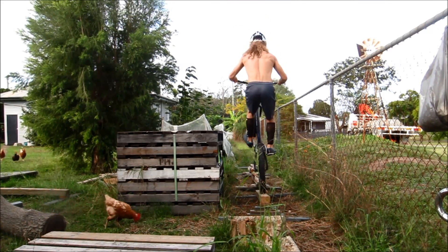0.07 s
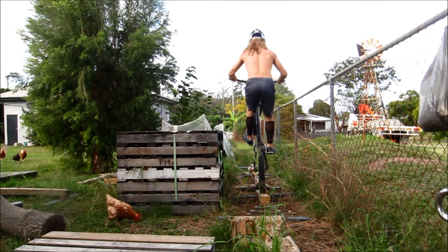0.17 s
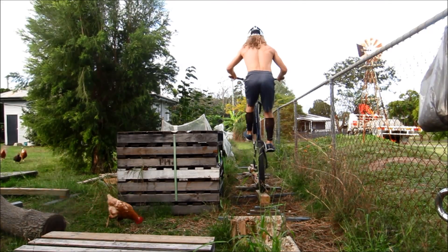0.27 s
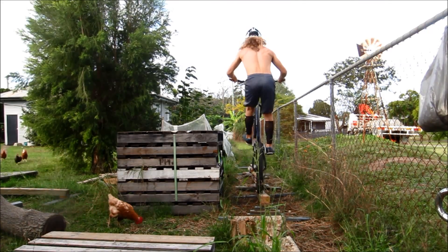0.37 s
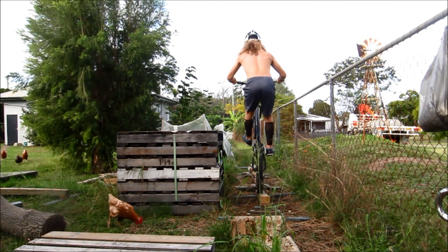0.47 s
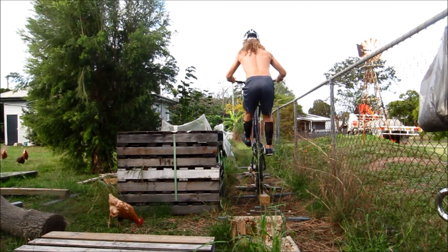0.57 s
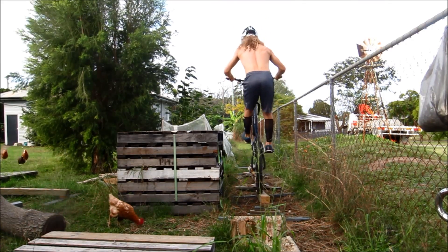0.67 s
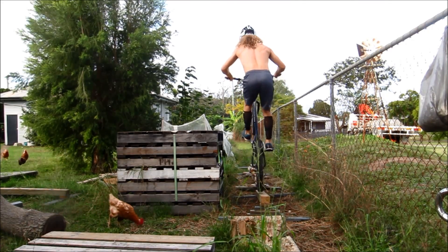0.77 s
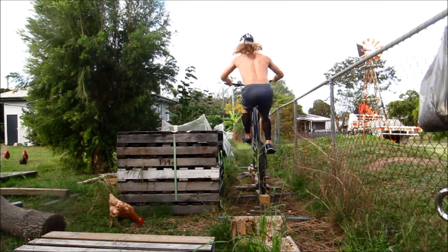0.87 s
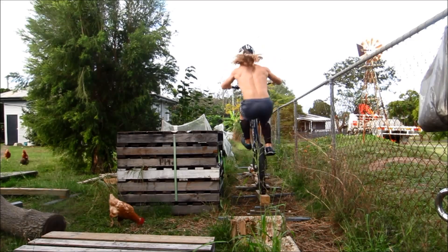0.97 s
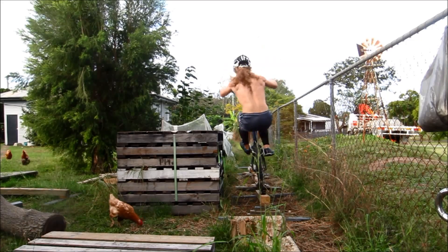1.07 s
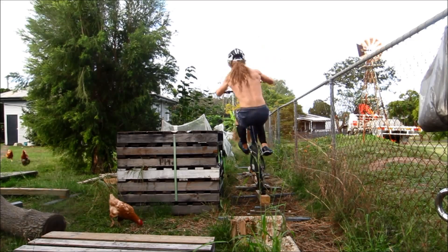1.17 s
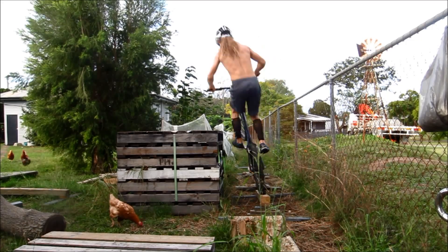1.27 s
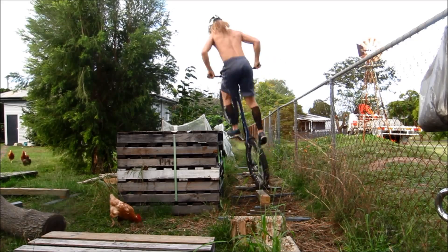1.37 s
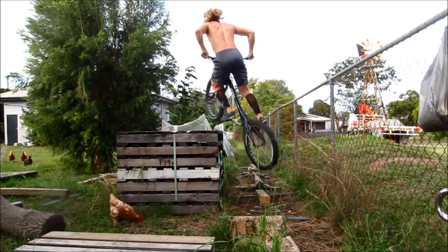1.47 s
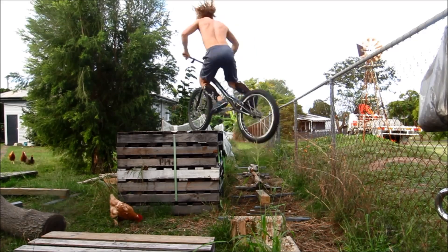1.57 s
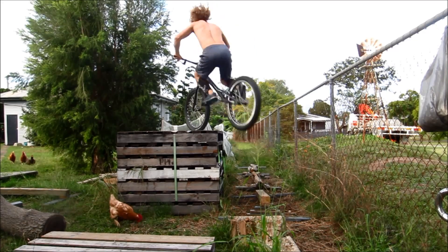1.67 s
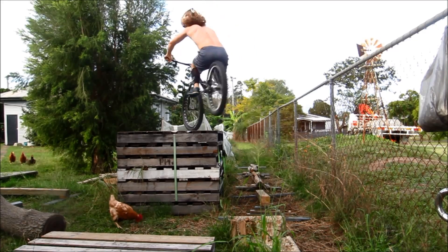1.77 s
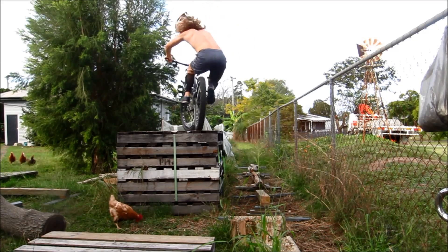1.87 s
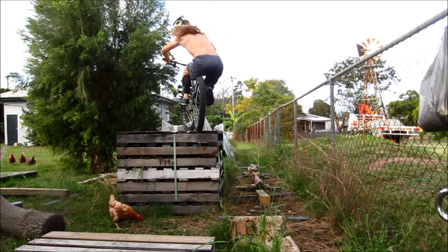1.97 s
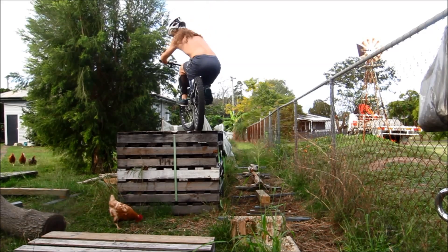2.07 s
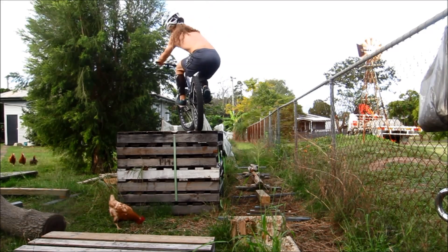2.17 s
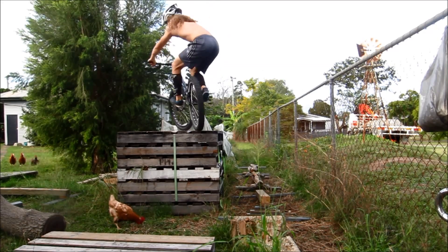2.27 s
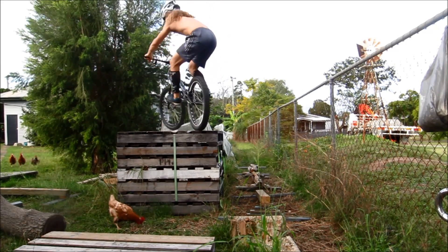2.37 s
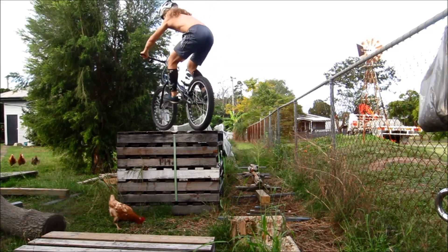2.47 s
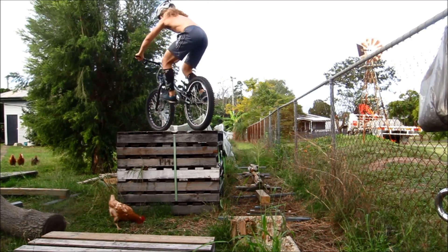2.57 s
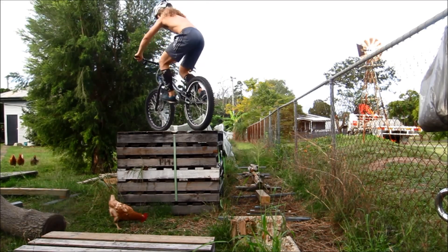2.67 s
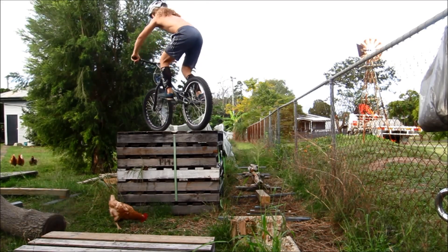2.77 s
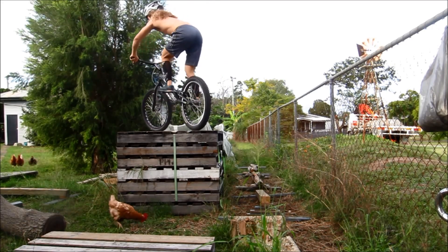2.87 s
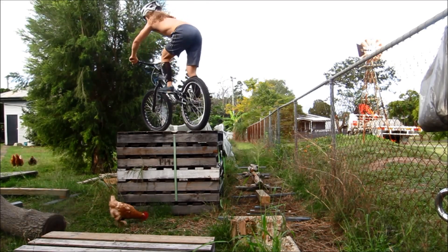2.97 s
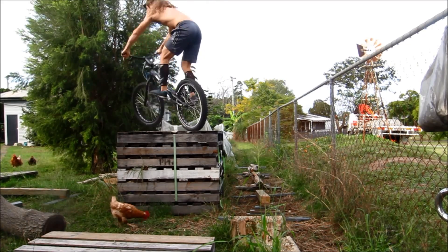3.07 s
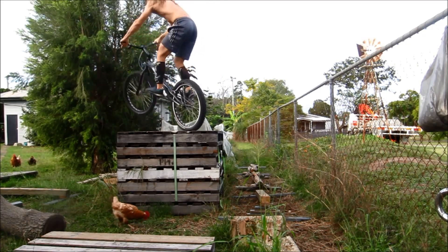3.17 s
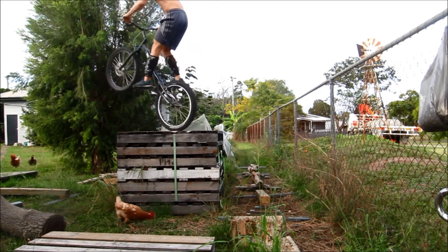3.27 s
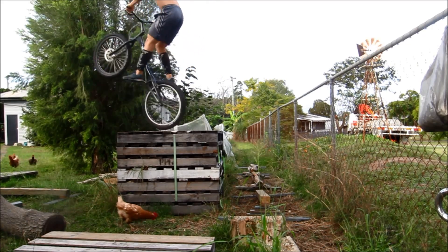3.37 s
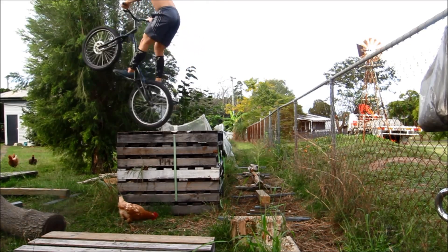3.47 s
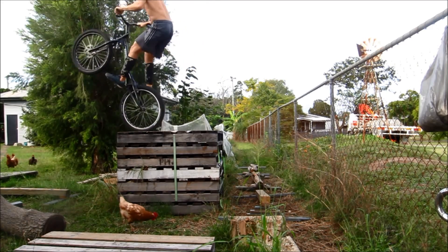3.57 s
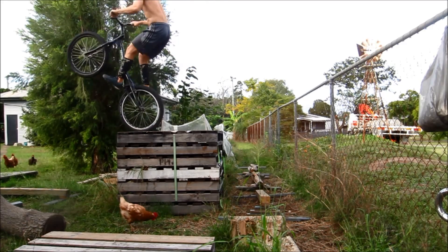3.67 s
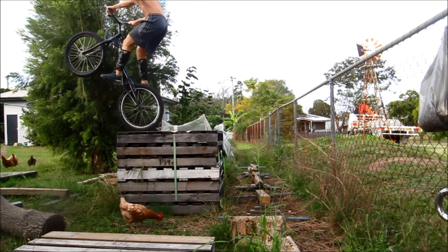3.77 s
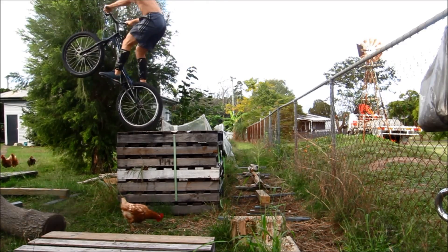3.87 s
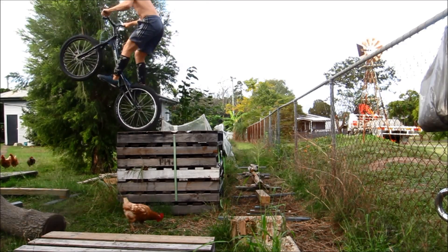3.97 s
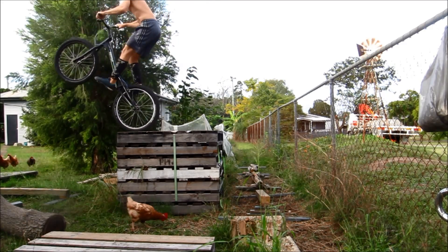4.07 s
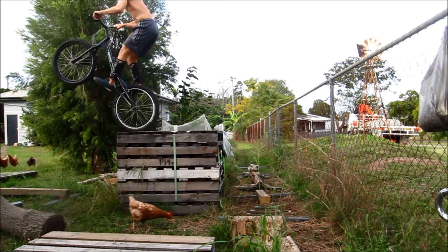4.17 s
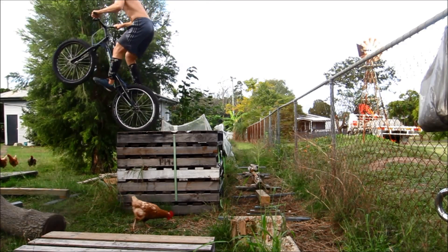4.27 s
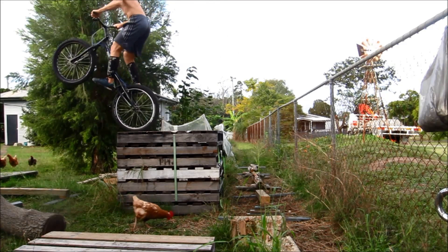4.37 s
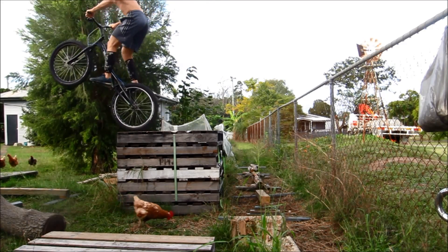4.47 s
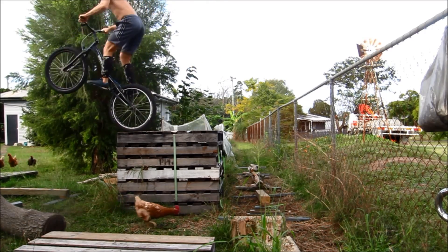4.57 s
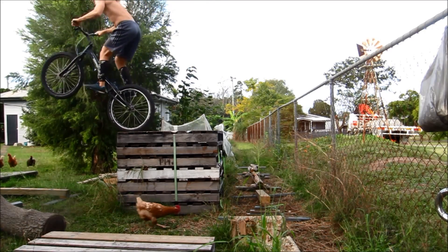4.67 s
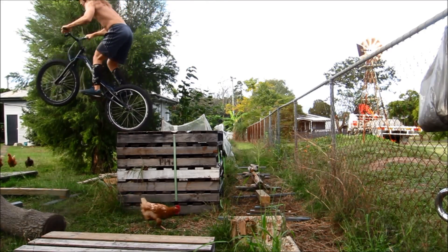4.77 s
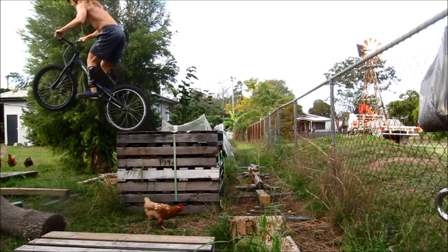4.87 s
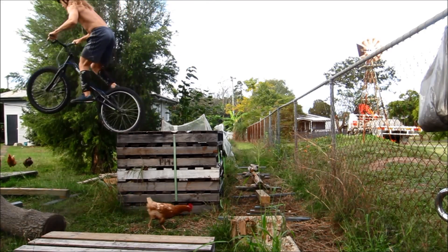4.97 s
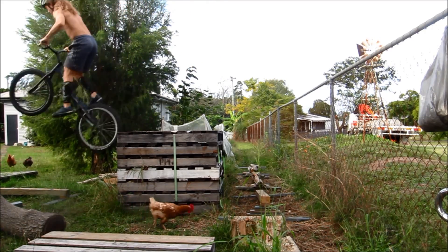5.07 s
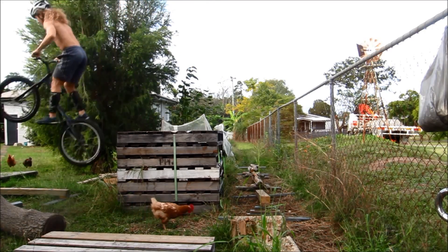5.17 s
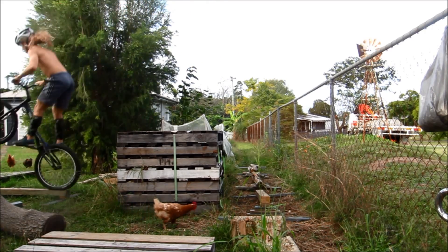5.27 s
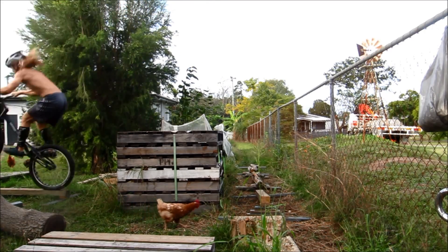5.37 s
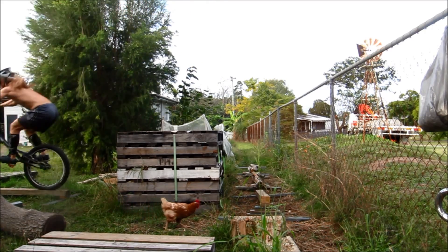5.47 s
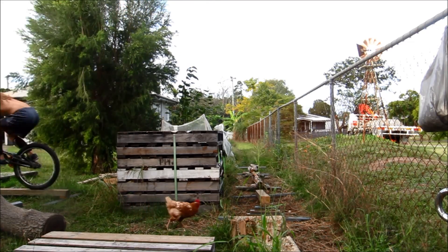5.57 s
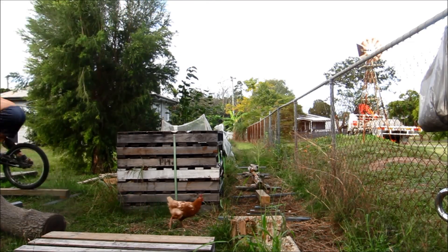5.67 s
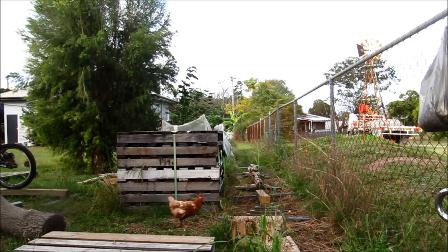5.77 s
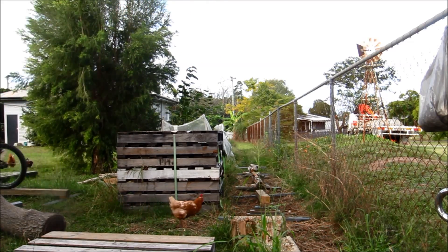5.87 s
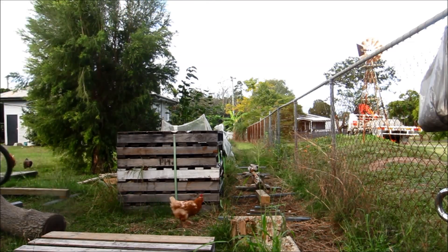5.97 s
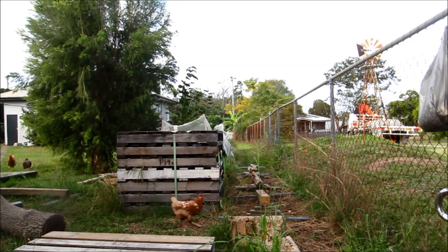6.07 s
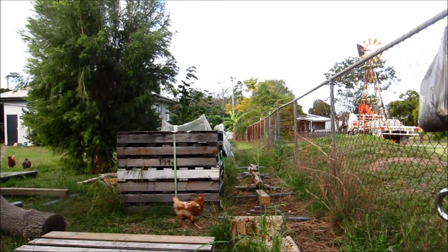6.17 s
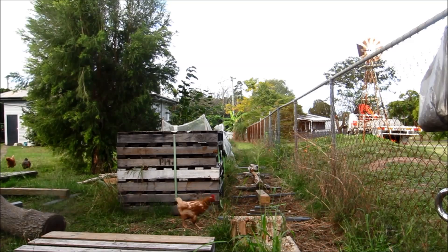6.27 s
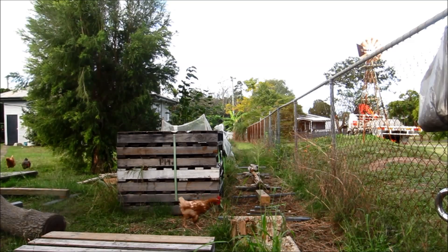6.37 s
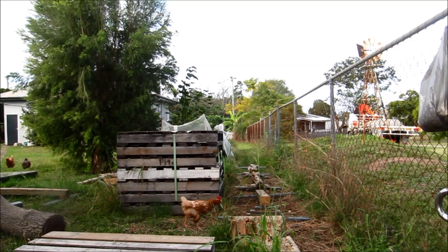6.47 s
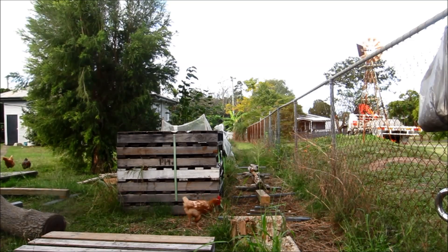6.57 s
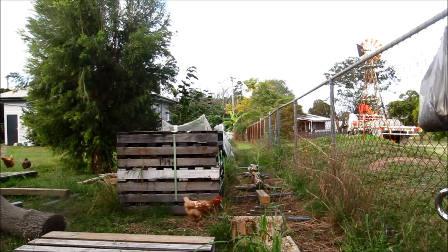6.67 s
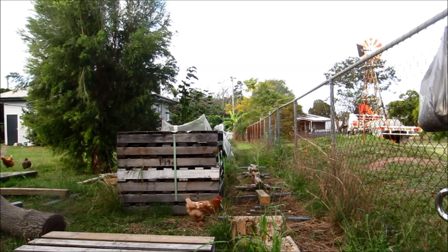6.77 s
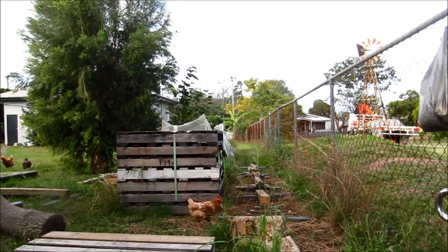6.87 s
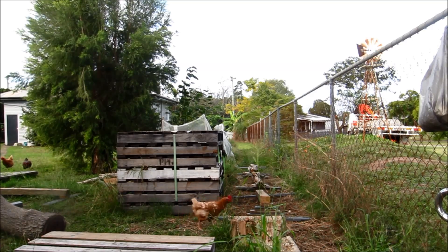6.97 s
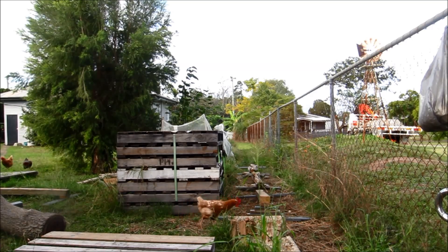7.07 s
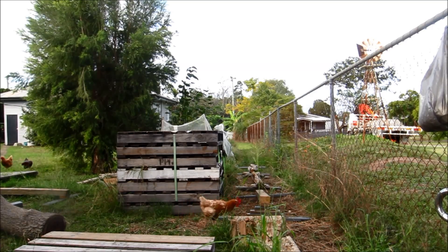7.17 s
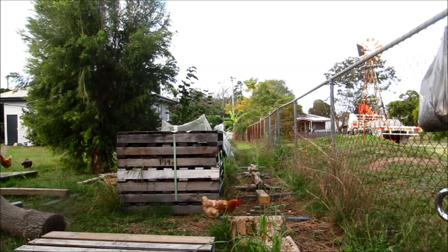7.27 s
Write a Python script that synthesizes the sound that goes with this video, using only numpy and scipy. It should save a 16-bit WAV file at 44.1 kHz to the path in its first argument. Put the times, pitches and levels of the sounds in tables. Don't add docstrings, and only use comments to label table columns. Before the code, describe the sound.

A low, steady far-traffic roar with an engine hum lies under everything, in an open yard with a short diffuse echo. From 0 to 1.2 seconds, chain, spokes and levers tick and rattle, with tiny rubber chirps near 0.2 and 1.1. At 1.33-1.5 rim brakes squawk in quick harsh bursts; at 1.65 tyres slam a hollow pallet stack with a woody boom. Softer thumps and metal rattles follow at 2.0 and 2.6, with a knock at 3.0 and brief freewheel buzzes around 2.85 and 3.4. A loud brake bark hits at 3.5 and the traffic dips. Faint bumps and squeaks run from 4.0 to 4.6. At 5.24 a hard squawk and clattering knock sound, then a landing thud at 5.6. Freewheel clicks and small ticks trail from 6.0 to 7.0 as traffic swells back.

```python
import sys
import numpy as np
from scipy import signal
from scipy.fft import rfft, irfft, next_fast_len
from scipy.io import wavfile
from scipy.ndimage import uniform_filter1d, map_coordinates

SR = 44100
rng = np.random.default_rng(int(sys.argv[2]) if len(sys.argv) > 2 else 0)


def volts_from_decibels(level):
    exponent = np.asarray(level, float) / 20
    return 10 ** exponent


def output_pcm(signal):
    pcm = np.clip(np.atleast_2d(signal).T, -1, 1) * 32767
    wavfile.write(sys.argv[1], SR, np.round(pcm).astype(np.int16))


N = 322803
T = np.arange(N) / SR


def band(x, hz, width):
    return signal.lfilter(*signal.iirpeak(min(hz, .45 * SR), hz / width, fs=SR), x)


def body(x, modes):
    return sum((-1) ** k * volts_from_decibels(db) * band(x, hz, width) for k, (hz, width, db) in enumerate(modes))


def decay(t, t60):
    return np.exp(-np.log(1000) * t / t60)


def ring(t, hz, db, t60):
    return volts_from_decibels(db) * np.sin(2 * np.pi * hz * t) * decay(t, t60)


def cut(x, lo_hz, hi_hz):
    return signal.sosfilt(signal.butter(3, [lo_hz, hi_hz], "band", fs=SR, output="sos"), x)


def top(x):
    return cut(band(x, 10400, 3000.0) + 0.2 * x, 7800, 15800)


def peak(x, db):
    return x * volts_from_decibels(db) / np.abs(x).max()


def rms(x):
    return x / np.sqrt(np.mean(x ** 2))


def add(out, x, s):
    i = int(s * SR)
    out[i:i + len(x)] += x[:N - i]


def walk(rate, size=N):
    k = int(SR / rate)
    steps = np.repeat(rng.standard_normal(size // k + 1), k)
    return 2.18 * uniform_filter1d(uniform_filter1d(steps, k), k)[:size]


def pulses(hz, jitter, scatter_db, chance):
    period = max(int(SR / np.mean(hz)), 1)
    unevenness = rms(uniform_filter1d(chance[0], period))
    cycle = np.floor(np.cumsum(hz / SR * (1 + jitter * unevenness)))
    return np.diff(cycle, prepend=0).clip(0, 1) * volts_from_decibels(scatter_db * chance[1])


def brakes():
    # start in seconds, peak in dB, slip rate in Hz, fade length in ms, swell in ms.
    grabs = [(1.331, -2.5, 910, 7.4, 10.5), (1.347, -5.5, 719, 20, 6.4), (1.450, -4.5, 809, 14, 10.6),
             (1.488, -19.5, 812, 37, 2.5), (3.503, 1, 903, 8.5, 5.07), (5.236, 1, 722, 14, 4.3),
             (5.249, -5, 850, 8.5, 4.8), (2.766, -22, 2400, 9.9, 10.5)]
    # frequency in Hz, width in Hz, level in dB.
    fork_notes = [(1763, 100, -7.5), (2560, 120, -8), (2940, 110, -6), (3540, 240, -6), (4300, 160, -13),
                  (4780, 90, -11), (5720, 81, -12)]
    # frequency in Hz, width in Hz, level in dB.
    rim_notes = [(880, 110, -19), (560, 200, -21), (1170, 190, -9), (1470, 130, -4), (1800, 300, -8),
                 (2140, 120, -6), (2635, 540, -6), (3400, 610, -8), (5600, 1400, -5), (10400, 13600, -10)]
    # frequency in Hz, level in dB, t60 in seconds.
    rear_rim = [(868, -7.5, 1), (900, -3.5, 0.6), (985, 6, 0.091), (1810, -4, 0.35), (1670, -7, 0.4),
                (2750, -12, .3)]
    front_rim = [(856, 0, 1.03), (838, -6, 1.1), (1133, -2, 0.061), (1860, -8.5, 0.45)]
    # start in seconds, level in dB.
    rear_rings = [(1.35, -27.5), (3.515, -28), (5.26, -32)]
    front_rings = [(1.47, -29), (5.26, -29.5), (5.61, -38.5)]
    slow_slip_hz, slow_note_db = 793, -9
    fork_spread, bright_db = .04, -3.5
    ring_duck = 0.71
    out, rings, ms = np.zeros(N), np.zeros(N), T[:SR // 8] * 1000
    draws = rng.standard_normal((len(grabs), 3, SR // 8))
    for (s, db, hz, fade_ms, swell_ms), chance in zip(grabs, draws):
        swell = np.clip(ms / swell_ms, 0, 1) ** 1.14
        grip = swell * np.exp(-np.clip(ms - swell_ms, 0, None) / (0.5 * fade_ms))
        slip_hz = hz * (1 - 0.0014 * ms).clip(.8, 1)
        scrape = 0.13 * chance[2]
        slips = (pulses(slip_hz, 0.055, 2.54, chance) + scrape) * grip
        fork = [(f * (1 + fork_spread * c), w, g) for (f, w, g), c in zip(fork_notes, chance[2, -8:])]
        squawk = volts_from_decibels(slow_note_db * (hz < slow_slip_hz)) * 0.98 * band(slips, hz, 104.0)
        squawk = squawk + 0.67 * band(slips, 2 * hz, 210.0)
        squawk = squawk + volts_from_decibels(bright_db) * body(slips, rim_notes[3:]) + 0.23 * body(slips, rim_notes[:3])
        squawk = squawk + 0.75 * body(slips + scrape * grip, fork)
        add(out, peak(cut(squawk, 380, 11400), db), s)
    for modes, strikes in ((rear_rim, rear_rings), (front_rim, front_rings)):
        for s, db in strikes:
            disturbed = sum(ring(T[:SR], *mode) * volts_from_decibels(1.7 * walk(50, size=SR)) for mode in modes)
            add(rings, volts_from_decibels(db) * disturbed, s)
    return out + rings * volts_from_decibels(ring_duck * ducking())


def thuds():
    # start in seconds, peak in dB, main note
    # in Hz, slap in dB.
    landings = [(0.957, -34, 231, -3), (1.655, -7.5, 212.7, -10), (1.952, -19, 191.5, -2),
                (1.967, -21.5, 216, -11), (1.985, -16.5, 209, 5), (2.593, -17.5, 215, -15),
                (3.116, -24.5, 199, -6.5), (3.591, -28.5, 240, -6), (3.991, -23, 229, -13),
                (4.014, -26, 206, -7), (4.625, -29, 245, -13), (4.644, -27.5, 206, 1),
                (5.11, -27, 234, -12), (5.373, -31.5, 213, -9), (5.428, -37, 249, -14),
                (5.588, -22, 265, -6)]
    # ratio to the main note, level in dB, t60 in seconds.
    stack_modes = [(.25, -16, .2), (.52, -10.5, .2), (.86, -8, .14), (1.0, 0, 0.6), (1.17, -14.5, 0.088),
                   (1.72, -5.5, 0.18), (2.3, -19, 0.056), (2.85, -10.5, 0.13), (3.7, -20, 0.075)]
    # time in seconds, frequency in Hz, level in dB.
    tyre_air = [(1.75, 194.5, -53), (2.15, 194, -54), (2.5, 194, -56), (2.75, 193.6, -50),
                (3.19, 193.6, -48), (3.31, 193.6, -61), (4.0, 190, -58), (4.25, 190, -53), (4.55, 190, -60),
                (4.9, 189, -54), (5.23, 188.7, -53)]
    out, t = np.zeros(N), T[:SR // 3]
    for (s, db, hz, slap_db), chance in zip(landings, rng.standard_normal((len(landings), SR // 3))):
        modes = 0
        for (ratio, level, t60), c, e in zip(stack_modes, chance, chance[8:]):
            varies = abs(ratio - 1) > .1
            modes = modes + ring(t, hz * ratio * (1 + 0.032 * c * varies), level + 2.8 * e * varies, t60)
        rattle = 0.21 * peak(cut(chance, 216, 840) * np.exp(-t / 0.016), 0)
        contact_s = 0.038 * volts_from_decibels(0.32 * (db + 9))
        boom = modes * (1 - np.exp(-t / 0.00096)) * np.exp(-(t / contact_s) ** 2)
        add(out, peak(cut(peak(boom, 0) + rattle, 45, 2900), db), s)
        slap = cut(chance[::-1], 495, 2960) * np.exp(-t / 0.03)
        add(out, peak(slap, db + min(slap_db, 0) + 0.5), s)
    s, hz, db = np.transpose(tyre_air)
    hum = np.sin(2 * np.pi * np.cumsum(np.interp(T, s, hz) + 3.0 * walk(20)) / SR) * np.sqrt(2)
    return out + hum * volts_from_decibels(np.interp(T, s, db, -120, -120) + 3.0 * walk(22))


def knocks():
    # start in seconds, peak in dB, note in Hz, width in Hz, t60 in seconds.
    blows = [(0.9549, -23.5, 1890, 1800, 0.071), (1.343, -15, 890, 110, 0.025),
             (1.268, -22.5, 2300, 1200, 0.04), (1.654, -6.5, 2200, 2300, 0.0022),
             (3.0165, -14.5, 1950, 593, 0.024), (3.021, -26, 1800, 500, 0.07), (3.111, -30, 130, 97.2, .12),
             (3.5050, -4, 933, 188, 0.024), (5.2354, -4.5, 2940, 2400, 0.054),
             (5.238, -12, 10400, 3000, 0.09), (5.247, -9, 2860, 2400, 0.044), (5.25, -16, 1100, 300, 0.084),
             (5.580, -29, 1800, 2400, 0.015), (5.5882, -9, 720, 250, 0.02), (5.5883, -9, 1290, 300, 0.02),
             (5.602, -17.5, 900, 503, 0.096), (5.606, -17, 3150, 1490, 0.062),
             (5.612, -23, 1600, 800, 0.09), (5.615, -40, 4670, 400, 0.026), (6.302, -30, 62, 55, 0.096),
             (5.24, -30, 540, 45, .025), (5.11, -32, 95, 40, .12), (3.995, -32, 360, 50, .1),
             (5.25, -10, 845, 75, .02), (3.5, -22, 3000, 2500, .04), (3.506, -16, 6000, 3000, .045),
             (3.507, -17, 10600, 3000, .045), (3.535, -31, 11000, 2800, .06),
             (5.275, -26, 10500, 2800, .06), (3.505, -17, 1790, 130, .025), (5.592, -22, 480, 200, .09),
             (1.338, -16, 5600, 1200, .04), (1.352, -19, 5600, 1200, .05), (5.238, -14, 5600, 2000, .06)]
    clean_t60_s, click_db = .028, 16
    out, t = np.zeros(N), T[:8192]
    for (s, db, hz, width, t60), chance in zip(blows, rng.standard_normal((len(blows), 8192))):
        rattle = chance * decay(t, t60) * (1 - np.exp(-t / (0.08 * t60)))
        click = np.exp(-((t - .0007) / 0.00011) ** 2)
        blow = rattle - volts_from_decibels(click_db) * (t60 < clean_t60_s) * click
        for broad in (width, 1.4 * width, min(7.1 * width, SR / 2.1)):
            blow = band(blow, hz, broad)
        add(out, peak(blow, db), s)
    return out


def ticks():
    # start in seconds, peak in dB, note in Hz.
    chain = [(.485, -25, 5900), (.5357, -29.5, 5730), (.942, -40, 5330), (1.0096, -16, 4820),
             (1.2995, -21.5, 5750), (1.4115, -21, 6600), (1.4247, -23, 4680), (1.6616, -15, 4480),
             (1.7783, -20, 5270), (1.9859, -19, 5430), (2.2567, -26.5, 5600), (2.2694, -22, 4870),
             (2.369, -30, 5770), (2.5977, -20.5, 4670), (2.6355, -19.5, 5500), (2.661, -28, 5390),
             (2.7262, -37, 4970), (2.8307, -22, 5750), (3.1185, -19, 4770), (3.7044, -34, 5260),
             (4.5929, -24.5, 6470), (4.6039, -20.5, 5200), (6.436, -30.5, 4840)]
    links = [(1.016, -22, 4800), (4.868, -38, 3000), (4.894, -30, 5000), (5.04, -40, 4500),
             (5.055, -42, 5200), (5.08, -35, 6500), (5.447, -36, 6560), (5.472, -39, 6500)]
    spokes = [(.0054, -18, 2650), (.0536, -19.5, 2800), (.1444, -43, 3700), (.4392, -24, 3000),
              (.584, -31, 4050), (.9552, -21, 3070), (1.081, -27, 4300), (1.529, -18.5, 4370),
              (2.5548, -21, 4120), (2.563, -38, 3830), (3.0585, -27, 2730), (3.3652, -16, 3030),
              (3.7137, -30.5, 3600), (4.029, -31, 3540), (5.3758, -28, 3230), (5.4934, -35, 3180),
              (5.543, -37, 4000), (6.4587, -30.5, 3580), (6.4877, -29, 4160), (6.8604, -25.5, 3460),
              (6.9371, -28, 3470), (6.9875, -25.5, 3470)]
    levers = [(.016, -26, 5900), (.0822, -32, 5200), (.471, -20.5, 3380), (.637, -38, 3730),
              (1.0054, -17.5, 6050), (1.268, -14.5, 5200), (1.2893, -17.5, 5100), (1.4504, -17.5, 3180),
              (1.503, -22, 5180), (1.5386, -20.5, 5600), (1.6174, -21, 3620), (1.7447, -19.5, 3600),
              (1.928, -26.5, 3310), (2.2025, -27.5, 4970), (3.7444, -40.5, 3130), (3.9897, -36, 3340),
              (4.0036, -25, 3250), (4.0966, -36, 4330), (4.1994, -32, 3750), (4.362, -41, 4500),
              (4.637, -29, 3200), (4.7307, -31, 5200), (4.8995, -20.5, 3400), (5.826, -27.5, 3480),
              (5.893, -35, 3700), (5.9339, -38, 3960)]
    cables = [(.1274, -28, 3000), (2.0096, -28, 3700), (2.087, -27, 3450), (3.382, -21, 3400),
              (3.59, -28.5, 2870), (3.6574, -32.5, 3560), (4.064, -32, 2990), (4.129, -37, 4390),
              (5.3852, -28.5, 3360), (6.7074, -21, 4150)]
    pedals = [(.4216, -23, 3270), (1.152, -33, 3100), (1.6787, -17, 3400), (1.8612, -17.5, 4900),
              (1.8786, -19.5, 3400), (1.9542, -22.5, 4700), (2.158, -32.5, 3270), (2.314, -19.5, 3430),
              (2.7422, -26, 6200), (5.098, -26, 3830), (5.4194, -39, 3480), (5.4494, -39, 3600),
              (5.607, -15.5, 4800), (5.616, -29, 3330)]
    pawls = [(6.0901, -38, 3410), (6.1275, -35, 4510), (6.1575, -30, 3030), (6.1934, -32, 4100),
             (6.2173, -31, 4190), (6.2538, -30, 3180), (6.3031, -27, 3890), (6.3201, -29, 3900),
             (6.3575, -36, 4000), (6.2787, -33, 3600), (6.6074, -31, 3900), (6.9486, -36, 3700),
             (6.5092, -37, 3790), (6.5705, -32, 3920), (6.7382, -31, 4400), (6.7915, -34, 4090),
             (6.8135, -30, 3880), (6.8369, -31, 3810), (6.9083, -33, 3680)]
    # contacts, bright top in dB, t60 in seconds.
    parts = [(chain, -5, 0.031), (spokes, -5.5, 0.047), (levers, -13.5, 0.048), (cables, -12, 0.11),
             (pedals, -6.5, 0.089), (pawls, -1, 0.022), (links, -3.5, .035)]
    out, t = np.zeros(N), T[:4096]
    for contacts, top_db, t60 in parts:
        fade = decay(t, t60) * (1 - np.exp(-t / (0.04 * t60)))
        chance = rng.standard_normal((len(contacts), 2, 4096))
        clumping = volts_from_decibels(21.4 * uniform_filter1d(chance[:, 1], size=40))
        spray = chance[:, 0] * clumping * fade
        for (s, db, hz), raw, broad, bright in zip(contacts, spray, cut(spray, 1220, 7150), top(spray)):
            note = band(raw, hz, 420.0) * 1.84
            add(out, peak(note + broad, db) + peak(bright, db + top_db), s)
    return out


def freewheel():
    # start in seconds, length
    # in seconds, level in dB, pawl clicks per second, chain hiss from 0 to 1.
    spins = [(1.36, 0.15, -44.5, 74, .9), (1.996, 0.24, -51, 53, .9), (2.564, 0.34, -58.5, 60, .9),
             (2.844, .15, -33, 113, 0.075), (3.231, 0.16, -50, 110, 1), (3.383, 0.12, -32, 115, 0.4),
             (5.111, 0.11, -29, 95, 1), (5.29, 0.3, -54.5, 63, .9), (5.643, 0.17, -43, 77, 0.21),
             (6.002, 0.075, -40.5, 104, 0.2), (6.09, 0.06, -39, 103, 0.2), (6.1575, 0.088, -39, 86, 0.2),
             (6.2538, 0.08, -38, 83, 0.22), (1.02, .155, -49, 60, .9), (1.24, .025, -52, 60, .9),
             (2.75, .07, -47, 60, .9), (6.34, .09, -54, 60, .9), (6.509, 0.31, -39.5, 88, 0.3),
             (6.821, 0.19, -45.5, 54, 0.25)]
    # frequency in Hz, width in Hz, level in dB.
    hub_modes = [(3840, 2400, 0.5), (6100, 2400, 2.5), (2200, 750, -2.5)]
    release_s, slowing_per_s = 0.013, .4
    near_db, near_top_db, top_db_per_db = -33, -2, 0.6
    out = np.zeros(N)
    for s, length, db, hz, blur in spins:
        t = T[:int((length + 5 * release_s) * SR)]
        chance = rng.standard_normal((5, SR // 2))[:, :len(t)]
        rate = hz * (1 - slowing_per_s * t)
        clicks = (t == 0) + pulses(rate, .04, 2.9, chance[:2])
        clicks = clicks + blur * pulses(rate * 1.7, 0.22, 6.1, chance[2:4])
        bursts = np.convolve(clicks, np.exp(-T[:1024] / 0.0028))[:len(t)]
        burst = chance[4] * (bursts + blur)
        if blur > .08:
            note = 1.3 * band(burst, 3600, 700.0)
        else:
            note = 1.4 * band(burst, 5200, 1400.0)
        top_db = near_top_db + top_db_per_db * (db - near_db)
        shell = rms(body(burst, hub_modes) + note) + volts_from_decibels(top_db) * rms(top(burst))
        add(out, shell * volts_from_decibels(db) * np.exp(-(t - length).clip(0) / release_s), s)
    return out


def chirps():
    # start in seconds, length in seconds, first pitch in Hz, last pitch in Hz, level in dB.
    glides = [(.147, 0.0091, 13100, 9000, -47), (0.207, 0.011, 9100, 13600, -41.5),
              (0.213, .012, 13700, 14000, -42), (0.625, 0.02, 14100, 5040, -55),
              (1.058, 0.013, 3300, 4600, -43), (1.08, 0.013, 8800, 10400, -47),
              (1.092, 0.022, 10350, 5030, -42), (1.11, 0.019, 5000, 6100, -36),
              (2.38, .024, 13500, 8350, -47), (2.427, 0.027, 12300, 9500, -53),
              (2.451, 0.046, 10200, 7600, -44.5), (2.773, .012, 4590, 4640, -39),
              (4.126, .014, 5600, 2600, -48), (4.136, .008, 5600, 5000, -52),
              (4.147, .011, 4180, 4600, -39), (4.157, .009, 4560, 5870, -45),
              (4.166, .007, 5900, 4400, -49), (4.169, 0.0114, 4470, 4450, -38),
              (4.179, 0.012, 4160, 3690, -40), (4.189, 0.012, 3700, 1980, -40.5),
              (4.191, 0.016, 5200, 4100, -45), (4.233, 0.013, 3300, 3560, -46.5),
              (1.86, 0.012, 7600, 3600, -38), (4.373, .012, 3770, 3780, -49.5),
              (4.451, 0.018, 3600, 4200, -47.5), (5.087, 0.033, 9200, 13700, -37),
              (1.066, .014, 10000, 11400, -52), (1.152, .02, 9500, 12200, -50),
              (2.742, .055, 6500, 6450, -50), (2.785, .03, 4600, 4600, -50)]
    glide_bend = 0.82
    out = np.zeros(N)
    for (s, length, from_hz, to_hz, db), chance in zip(glides, rng.standard_normal((len(glides), 2, 4096))):
        t = T[:int(length * SR)]
        pitch = from_hz + (to_hz - from_hz) * (t / length) ** glide_bend
        waver, flutter = (rms(uniform_filter1d(c[:len(t)], size=50)) for c in chance)
        phase = 2 * np.pi * np.cumsum(pitch * (1 + 0.022 * waver)) / SR
        tone = np.sin(phase) + 0.19 * np.sin(2 * phase) * (pitch < 7500)
        level = volts_from_decibels(db + 3.0 * flutter)
        add(out, np.sqrt(2) * tone * level * signal.windows.tukey(len(t), .3), s)
    return out


def traffic():
    # frequency in Hz, level in dB per Hz.
    roar = [(15, -25), (25, -11), (60, -9), (100, -6.5), (210, -10.5), (340, -16), (700, -10.5), (1030, -8),
            (1600, -14.5), (2140, -18.5), (3530, -31.5), (6900, -43), (12000, -46.5), (16000, -58)]
    # time in seconds, hum level in dB.
    engine_load = [(0, -45.5), (.65, -43.5), (1.4, -49), (1.8, -45), (2.5, -46.5), (3.1, -49.5), (4.0, -43),
                   (4.6, -41), (5.2, -43.5), (5.9, -45), (6.6, -40.5), (7.32, -46.5)]
    roar_db, hum_hz, hum_wander_hz, hum_duck = -38.5, 77, 1.2, 1.4
    car_s, car_rise_s, car_db, car_octave = 6.85, .3, 3.5, 5
    size = 2 * next_fast_len(N // 2 + 1)
    f = np.fft.rfftfreq(size, 1 / SR)[1:]
    roar_hz, level = np.transpose(roar)
    shape = volts_from_decibels(np.interp(np.log(f), np.log(roar_hz), level))
    mid, side = (rfft(rng.standard_normal(N), size)[1:] * shape for _ in range(2))
    side = side * np.clip(f / 3200 + 20.0 / f, .17, 1)
    car = car_db * ((T - car_s) / car_rise_s).clip(0, 1)
    out, octave = 0, np.log2(f / 30).clip(0, 9)
    for k in range(10):
        share = np.clip(1 - np.abs(octave - k), 0, 1)
        m, d = (irfft(np.r_[0, v * share], size)[:N] for v in (mid, side))
        flicker = volts_from_decibels(0.73 * walk(5 + k) + car * (k == car_octave))
        out = out + flicker * np.array([m + d, m - d])
    out = out / np.sqrt(np.mean(cut(out.mean(axis=0), 333, 2170) ** 2))
    phase = 2 * np.pi * np.cumsum(hum_hz + hum_wander_hz * walk(5.9)) / SR
    hum = np.sqrt(2) * np.sin(phase) * volts_from_decibels(0.53 * walk(7.9))
    hum = hum + 0.76 * rms(band(rng.standard_normal(N), hum_hz, 6.0))
    hum_db = np.interp(T, *np.transpose(engine_load)) + hum_duck * ducking()
    return out * volts_from_decibels(roar_db + ducking()) + hum * volts_from_decibels(hum_db)


def ducking():
    # blow in seconds, gain change in dB.
    loud_blows = [
        (3.51, -7.5),
        (5.24, -10),
        (5.45, -5),
    ]
    fall_s, hold_s, recover_s = 0.031, 0.28, 0.44
    gain = 0
    for s, db in loud_blows:
        fall = ((T - s) / fall_s).clip(0, 1)
        gain = gain + db * fall * np.exp(-(T - s - hold_s).clip(0) / recover_s)
    return gain


def scene():
    # time in seconds, right port's lag in samples.
    lag = [(0, 0.54), (2.5, 0.63), (4.5, 1.34), (5.3, 2.44), (6.0, 3.4), (7.32, 3.8)]
    yard_db, yard_t60_s = -9, 0.18
    bike = brakes() + thuds() + knocks() + ticks() + freewheel() + chirps()
    heard_at = np.arange(N) - np.interp(T, *np.transpose(lag))
    late = map_coordinates(bike, [heard_at], order=3, mode="nearest")
    t = T[:SR // 3]
    tail = rng.standard_normal((2, len(t))) * decay(t, yard_t60_s) * np.clip(t / 0.00087, 0, 1)
    tail = signal.lfilter([1, -.75], [1], cut(tail, 340, 10100))
    tail = tail / np.sqrt(np.sum(tail[0] ** 2))
    echo = signal.fftconvolve(bike[None], tail, axes=1)[:, :N]
    return np.array([bike, late]) + volts_from_decibels(yard_db) * echo + traffic()


def low_pass(x):
    return signal.sosfilt(signal.butter(12, 16430, fs=SR, output="sos"), x)


def record(dry):
    notch_hz, notch_width_hz, hiss_db, top_hz = 8184, 2230, -65, 15900
    x = dry + volts_from_decibels(hiss_db) * cut(rng.standard_normal(dry.shape), 2200, 16000)
    for sharpness in (notch_hz / notch_width_hz, 14.):
        x = signal.lfilter(*signal.iirnotch(notch_hz, sharpness, fs=SR), x)
    whine = volts_from_decibels(-76.5) * np.sin(2 * np.pi * 8800 * T)
    x = x + whine * np.array([[1], [-1]])
    x = signal.sosfilt(signal.ellip(12, .2, 70, top_hz, fs=SR, output="sos"), x)
    return low_pass(np.clip(x, -1, 1))


dry = scene()
out = record(dry)
output_pcm(out)
```